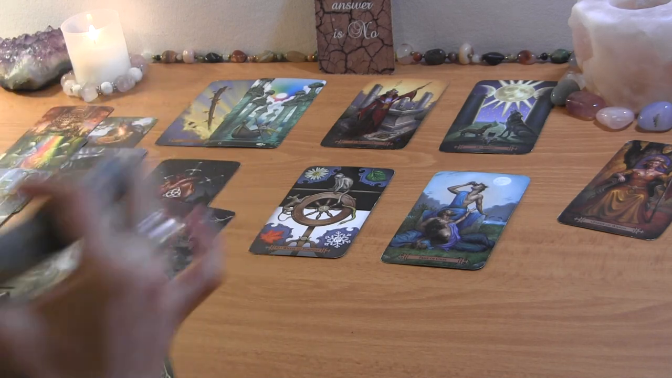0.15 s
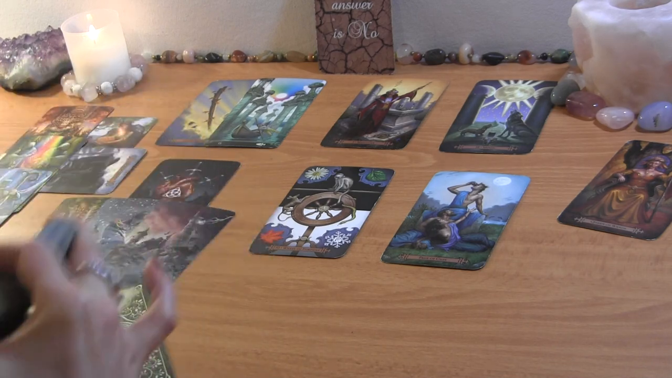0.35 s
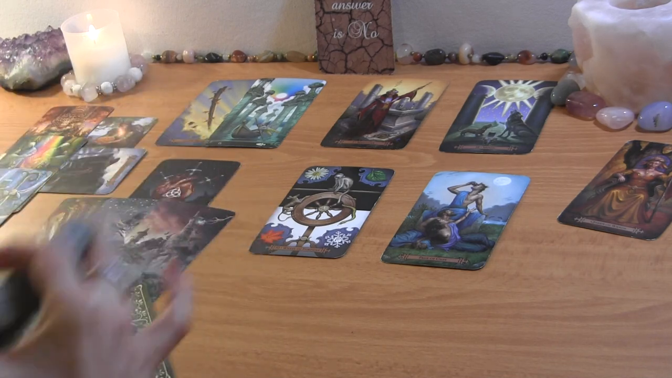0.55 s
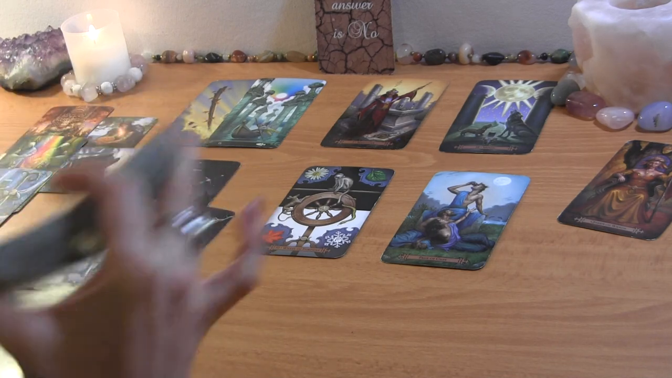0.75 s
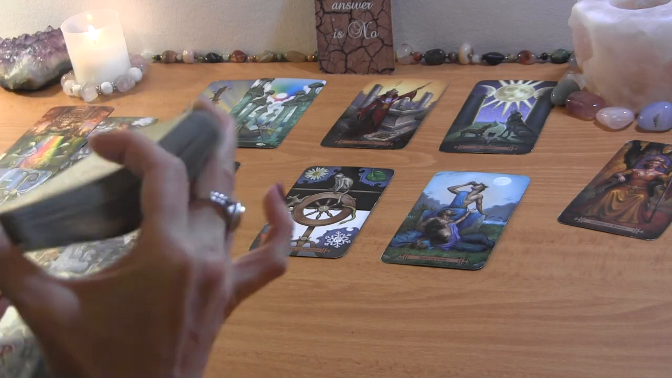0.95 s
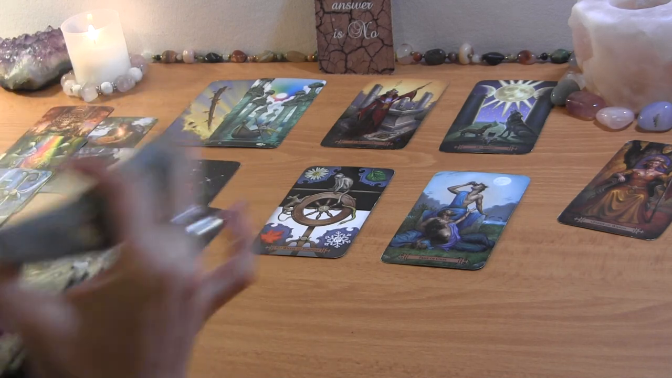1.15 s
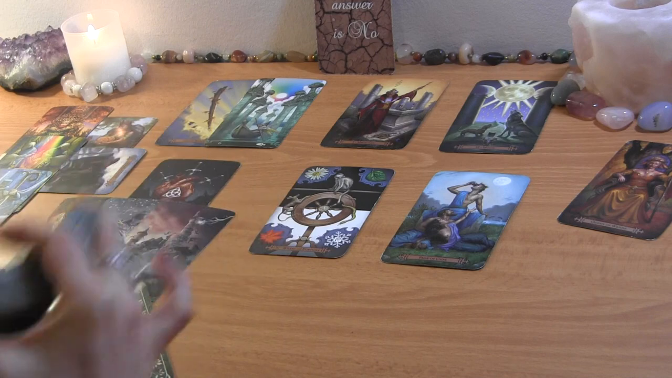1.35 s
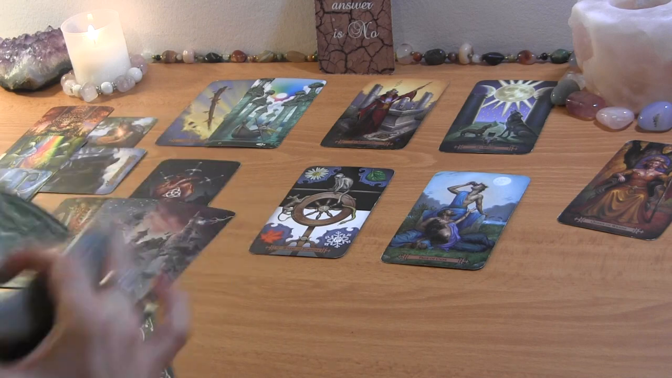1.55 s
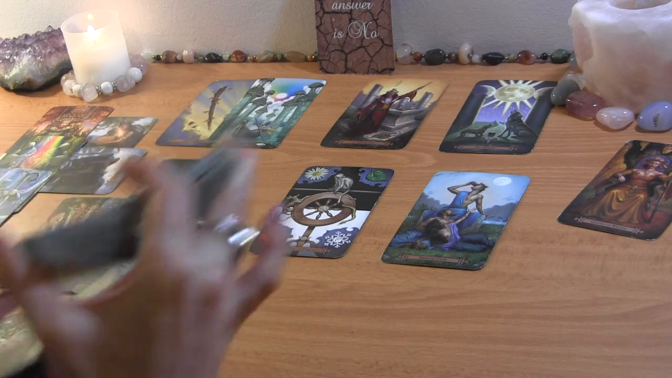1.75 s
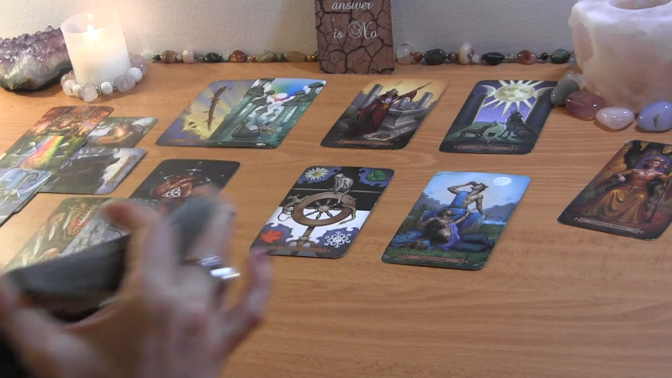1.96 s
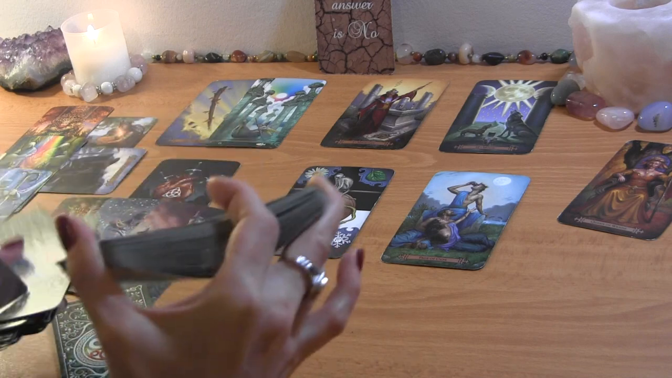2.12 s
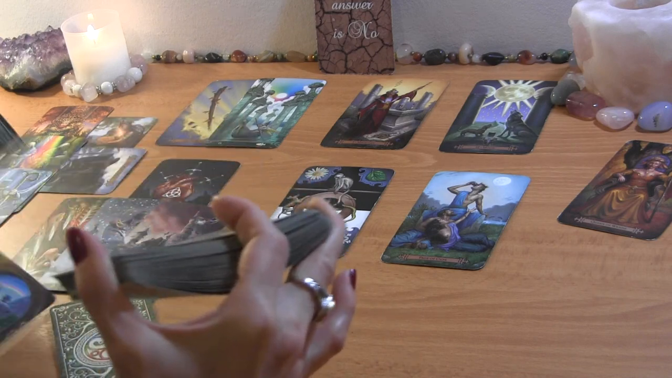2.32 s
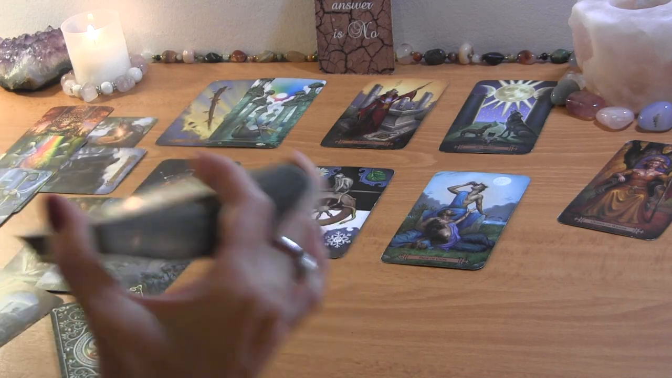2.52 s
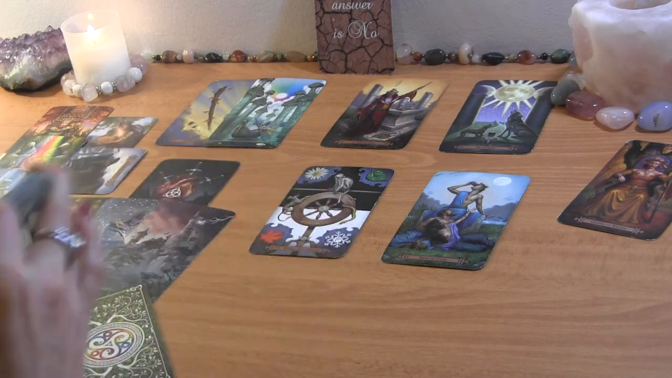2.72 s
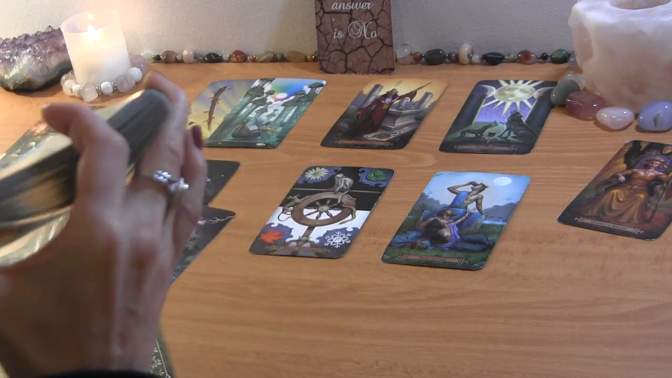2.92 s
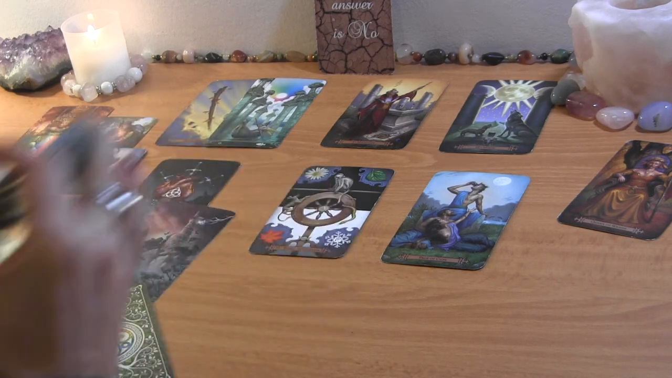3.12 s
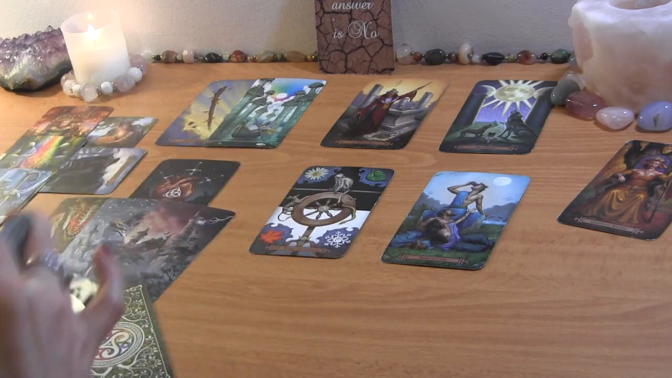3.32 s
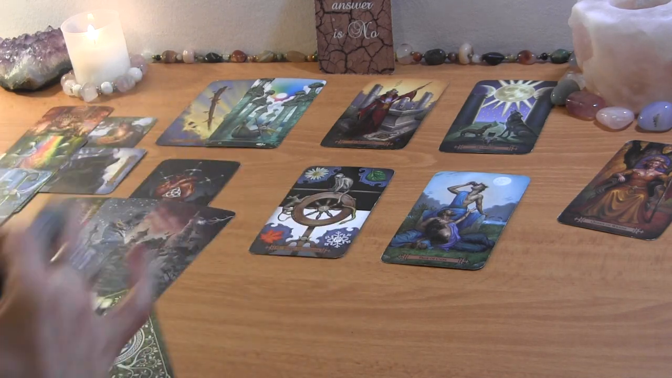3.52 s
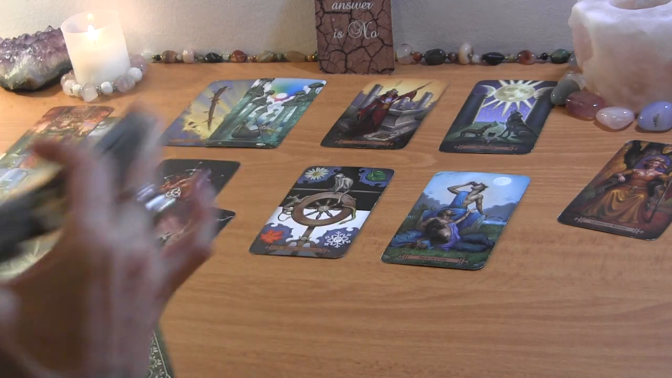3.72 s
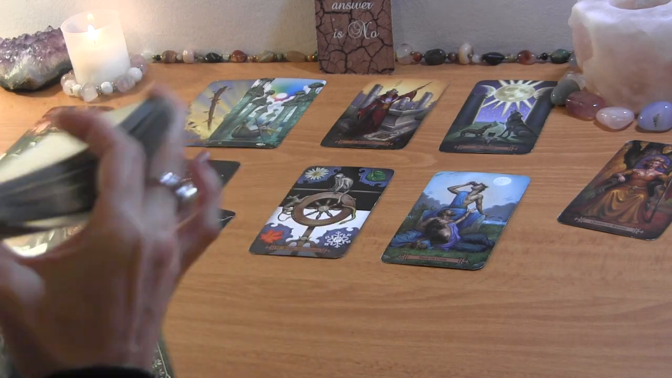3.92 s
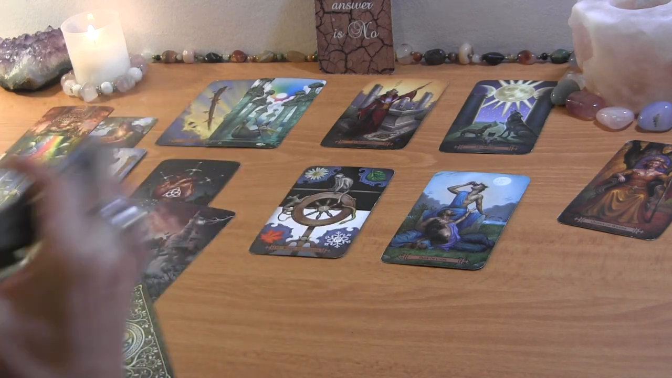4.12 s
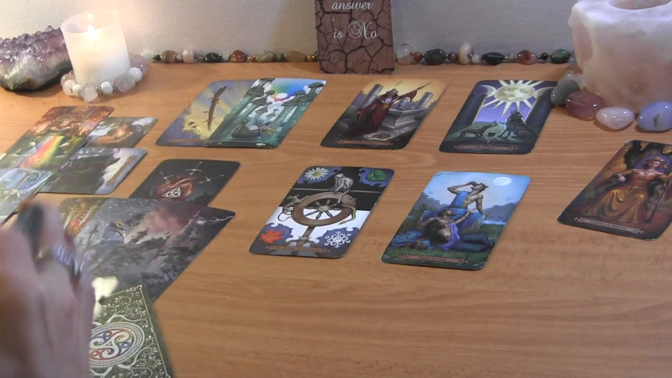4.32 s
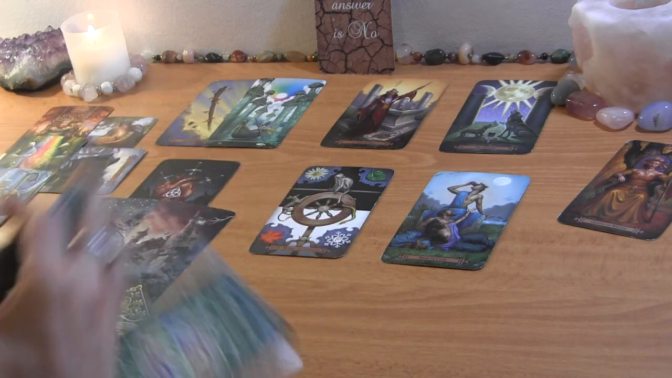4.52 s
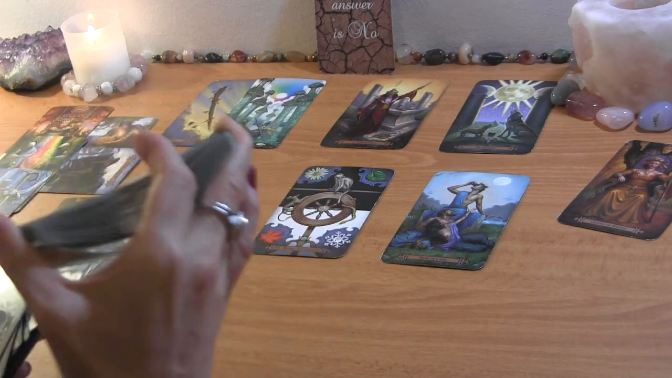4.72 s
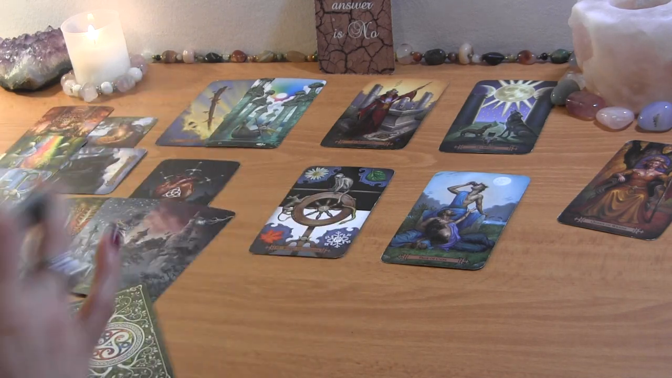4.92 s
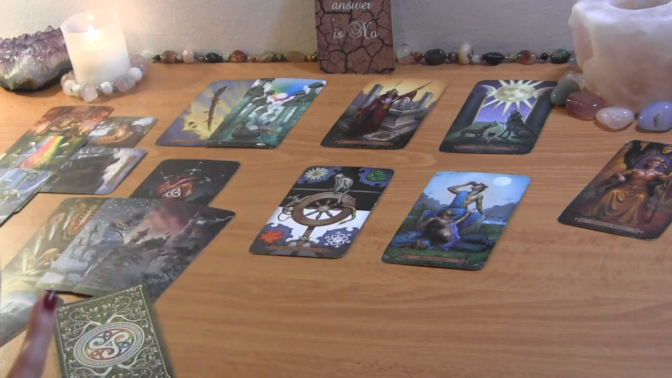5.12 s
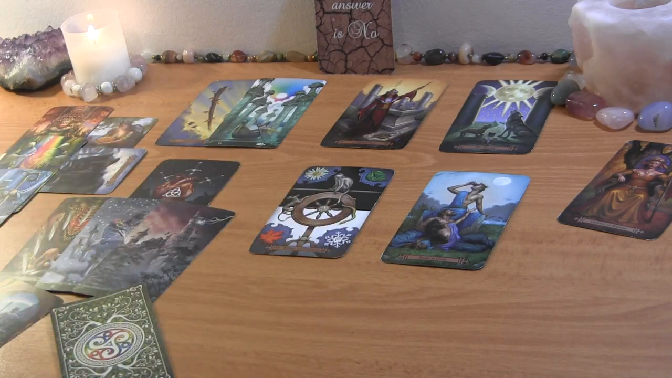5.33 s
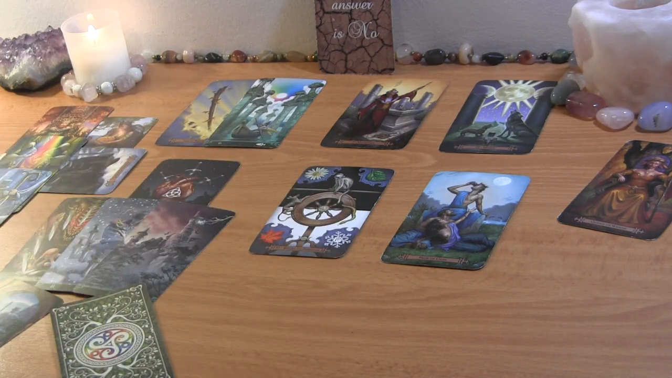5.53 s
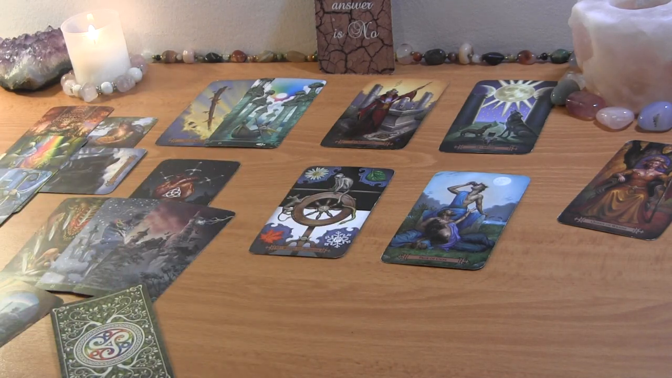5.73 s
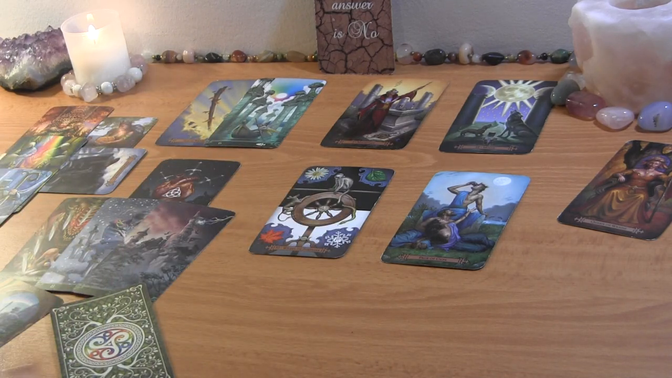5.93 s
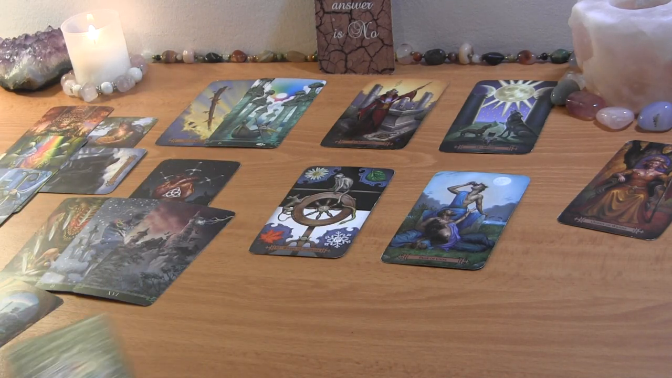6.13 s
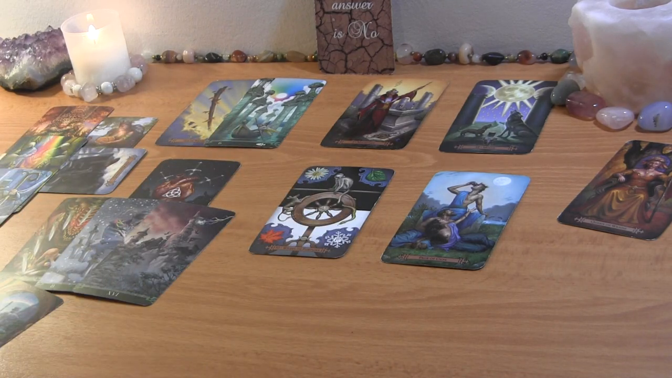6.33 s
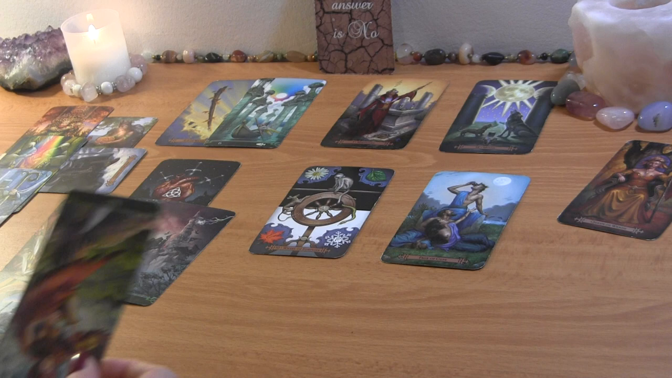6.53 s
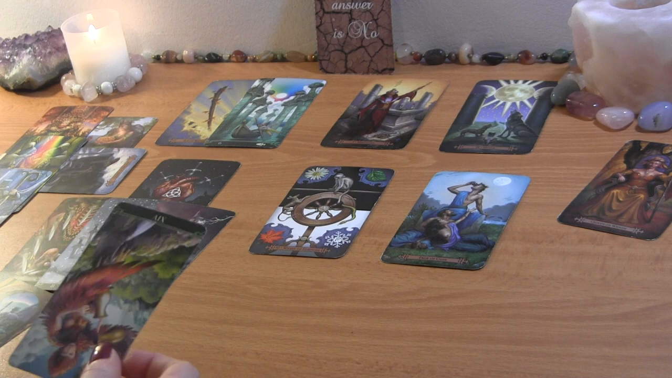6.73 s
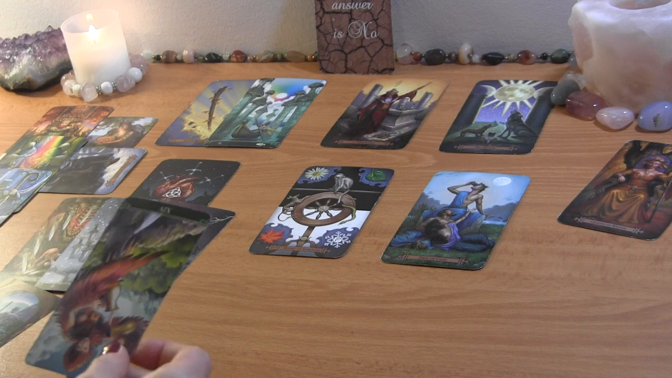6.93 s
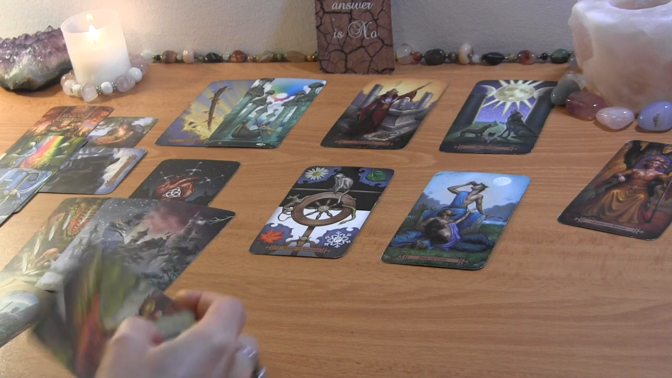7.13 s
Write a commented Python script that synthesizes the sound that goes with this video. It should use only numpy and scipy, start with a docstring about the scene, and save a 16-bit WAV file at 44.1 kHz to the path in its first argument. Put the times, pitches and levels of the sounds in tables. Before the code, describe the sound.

Large cards are shuffled overhand in steady crisp strokes, the deck is rapped on a wooden table, then cards are dragged and one laid down.

```python
"""A deck of large cards is shuffled overhand, then rapped on a wooden table, close by in a small live room.
In each stroke a packet lifts with a click, swishes down, rattles into the other hand and stops with a snap;
between runs the deck is knocked square and single edges flick. Then the deck raps the table, cards are dragged
off it, and one is laid out. Contacts are coloured trains of tiny random impacts; the table rings as dying sines.
Standing waves and seven alternating random echo patterns form the room, over a steady low hush."""
import sys
import numpy as np
from scipy import signal
from scipy.fft import rfft, irfft
from scipy.io import wavfile
from scipy.ndimage import uniform_filter1d

SR = 44100
rng = np.random.default_rng(int(sys.argv[2]) if len(sys.argv) > 2 else 0)


def generate_wav(signal):
    """Clip the signal to [-1, 1] and save it as 16-bit WAV at the path in sys.argv[1]."""
    frames = np.transpose(np.atleast_2d(signal))
    scaled = np.clip(frames, -1, 1) * 32767
    pcm = np.round(scaled).astype(np.int16)
    wavfile.write(sys.argv[1], SR, pcm)


N = 320166

TAPS = 4096
HZ = np.maximum(np.fft.rfftfreq(TAPS, 1 / SR), 1)  # frequency grid of every colour

# Spectrum of contact with the wooden top. Each row: frequency in Hz, relative level in dB.
WOOD_COLOUR = [(60, -26), (200, -15), (400, -6.5), (660, 0.5), (860, -4.5), (1500, -0.5), (1900, 0.5),
               (2700, -4), (3500, -7), (5200, -7.5), (7500, -11.5), (10000, -11), (16000, -38)]
# Low boom of the table. Each row: frequency in Hz, relative level in dB.
BOOM_COLOUR = [(30, -37), (60, -23), (90, -9.5), (120, 0), (190, -0.5), (300, -4), (500, -5), (1000, -22),
               (4000, -38)]

CLICK_S, SNAP_S = 0.0021, 0.0033  # decay times of a card flick and of a packet or deck edge


def amp(db):
    """Amplitude gain is exponential in decibels."""
    return 10 ** (np.asarray(db) / 20)


def read(points, hz):
    """Spectra are interpolated along log frequency, much as pitch is heard."""
    f, value = np.transpose(points)
    return np.interp(np.log(hz + 1), np.log(f), value)


def unit(x):
    """Energy is the sum of squares, here normalised to one."""
    return x / np.sqrt(np.sum(x ** 2) + 1e-20)


def seconds(length):
    """Sampled time: a uniform axis from zero, in seconds."""
    return np.arange(int(length * SR) + 2) / SR


def add(mix, s, sound):
    """Superposition: sound pressures add, here from time s onward."""
    start = round(s * SR)
    sound = sound[max(-start, 0):]
    part = mix[max(start, 0):][:len(sound)]
    part += sound[:len(part)]


def colour(x, db):
    """Minimum-phase filtering: the Hilbert transform of log gain gives the phase of a causal response."""
    log_gain = np.log(amp(np.maximum(db - db.max(), -90)))
    circle = np.concatenate([log_gain, log_gain[-2:0:-1]])
    response = np.exp(np.conj(signal.hilbert(circle)))[:len(HZ)]
    return signal.fftconvolve(x, irfft(response))


def contacts(envelope, db, per_s, spread_db):
    """Rough contact is a random train of uneven impacts, coloured by db and given the envelope's energy."""
    count = len(envelope)
    hits = rng.random(count) < per_s / SR
    hits[0] = True
    sizes = rng.choice([-1, 1], count) * amp(spread_db * np.minimum(rng.exponential(1, count), 3))
    train = hits * sizes * envelope
    # the cluster's own broad peaks are partly evened out, so that the material leads the colour
    power = uniform_filter1d(abs(rfft(unit(train), 8 * TAPS)) ** 2, size=120)[::8]
    evened_db = db - 10 * np.log10(power + .6)
    return unit(colour(train, evened_db)) * np.linalg.norm(envelope)


def tilted(points, tilt_db, pivot_hz=3000):
    """Spectral tilt: a constant slope in dB per octave above 800 Hz, and a fixed offset below."""
    return read(points, HZ) + tilt_db * np.log2(np.maximum(HZ, 800) / pivot_hz)


def resonance_db(hz, width, peak_db):
    """Resonance: a damped oscillator's peak stands out of a flat spectrum."""
    detuning = (HZ ** 2 - hz ** 2) / (HZ * width)
    return 10 * np.log10(1 + amp(peak_db) ** 2 / (1 + detuning ** 2))


def ringing(modes, t):
    """Modal superposition: each mode is a sine of random phase that loses 60 dB in its t60."""
    out = np.zeros(len(t))
    for hz, db, t60 in modes:
        out += amp(db - 60 * t / t60) * np.sin(2 * np.pi * (hz * t + rng.random()))
    return out


def pair(z, hz):
    """Coherence: mid and side shares of two unrelated spectra set the likeness of left and right."""
    # Likeness of the two microphones. Each row: frequency in Hz, correlation from -1 to 1.
    likeness = [(60, 0.11), (200, 0.68), (700, 0.91), (1400, 0.91), (3000, 0.84), (7000, 0.63),
                (15000, 0.49)]
    same = np.clip(read(likeness, hz), -1, 1)[:, None]
    mid, side = np.sqrt((1 + same) / 2) * z[0], np.sqrt((1 - same) / 2) * z[1]
    return np.array([mid + side, mid - side])


def hush(level_db=-56):
    """Low room noise and microphone hiss: stationary Gaussian noise shaped in frequency."""
    # Spectrum of the steady background. Each row: frequency in Hz, relative level in dB.
    hush_colour = [(20, -27.5), (55, -17), (85, -3.5), (180, 1), (300, -2), (700, -6), (1200, -10.5),
                   (4000, -15), (12000, -22), (16000, -31)]
    hz, _, z = signal.stft(rng.standard_normal((2, N)), SR, nperseg=2048)
    shaped = pair(z, hz) * amp(read(hush_colour, hz))[:, None]
    x = signal.istft(shaped, SR, nperseg=2048)[1][:, :N]
    return amp(level_db) * x / x.std()


def snap(db, tilt_db, length, peak_width_hz=900, peak_db=8, span=0.0024):
    """Impact: contacts die within milliseconds; a randomly placed broad resonance varies the colour."""
    # Spectrum of a card edge snapping. Each row: frequency in Hz, relative level in dB.
    snap_colour = [(80, -7.5), (300, 3), (1000, 1.5), (1700, 2.5), (3200, 0), (5200, 1), (8000, 0),
                   (11500, -2.5), (14000, -12.5), (16000, -28)]
    peak_hz = np.exp(rng.uniform(np.log(2500), np.log(9000)))
    shape = tilted(snap_colour, tilt_db) + resonance_db(peak_hz, peak_width_hz, peak_db)
    burst = unit(contacts(np.exp(-seconds(0.0048) / length), shape, 7000, 1.9))
    return amp(db) * np.sqrt(span * SR) * burst


def clap(db, hollows_hz, decay, hollow_q=4.5):
    """Cavity resonance: loose cards clap shut, and the enclosed air lends two hollow pitches."""
    # Spectrum of the loose deck. Each row: frequency in Hz, relative level in dB.
    deck_colour = [(50, -38), (150, -8.5), (400, -5), (1500, -9.5), (4000, -16), (10000, -21), (16000, -31)]
    lower_hz, upper_hz = hollows_hz
    lower = resonance_db(lower_hz, lower_hz / hollow_q, 15)
    upper = resonance_db(upper_hz, upper_hz / hollow_q, 16.5)
    shape = read(deck_colour, HZ) + np.maximum(lower, upper)
    return amp(db) * contacts(np.exp(-seconds(0.18) / decay), shape, 3000, 2.3)


def landing(s, db, edge_hz, palm_db, swish_db=-12, swish_rise=0.014, edge_width_hz=1100, edge_db=6,
            rattle_s=.0135, rattle_tilt_db=-1.1, rattle_fall=0.00078, palm_delay=0.0076, palm_fall=0.013,
            hollow_width_hz=120, hollow_db=1, settle_db=-13, settle_fall=0.008):
    """Successive impacts: a packet swishes in, rattles home and settles in the palm; lists (s, sound)."""
    # Spectrum of rattling edges. Each row: frequency in Hz, relative level in dB.
    rattle_colour = [(70, -9.5), (140, -3.5), (400, 2), (1200, -7), (2600, 2), (3600, 1), (5300, 1),
                     (7500, 1.5), (11000, -1), (13500, -10), (16000, -25)]
    # Spectrum of the push into the palm. Each row: frequency in Hz, relative level in dB.
    palm_colour = [(40, -16), (80, -20.5), (135, -1.5), (210, -1.5), (450, -1.5), (780, -1), (1200, -6),
                   (1700, 0), (2700, -10), (4500, -55), (12000, -30.5)]
    # Spectrum of the swish. Each row: frequency in Hz, relative level in dB.
    swish_colour = [(150, -7.5), (600, 9), (1500, 3.5), (4000, 1.5), (9000, 2), (13000, 1), (16000, -14)]
    lead, t = seconds(0.076), seconds(0.05)
    edges = tilted(rattle_colour, rattle_tilt_db) + resonance_db(edge_hz, edge_width_hz, edge_db)
    palm_hollow_hz = rng.uniform(385, 580)
    palm = read(palm_colour, HZ) + resonance_db(palm_hollow_hz, hollow_width_hz, hollow_db)
    swish = np.exp((lead - lead[-1]) / swish_rise)
    rattle = np.minimum(t / .0025, 1) * np.exp(-np.maximum(t - rattle_s, 0) / rattle_fall)
    push = np.minimum(t / palm_delay, 1) * np.exp(-np.maximum(t - palm_delay, 0) / palm_fall)
    settle = np.exp(-t / settle_fall)
    return [(s - lead[-1], amp(db + swish_db) * contacts(swish, read(swish_colour, HZ), 9000, 2.7)),
            (s, amp(db) * contacts(rattle, edges, 2800, 2.0)),
            (s + rattle_s, amp(db + settle_db) * contacts(settle, edges, 570, 1.5)),
            (s, amp(palm_db) * contacts(push, palm, 2500, 2.7))]


def shuffle(tick_db=-41, tick_spread_db=2.5, tick_tilt_db=-3, tick_lead_s=.065, count=2):
    """A stroke is a chain of contacts: lift-off, landing and stop, with faint random ticks before landing."""
    # Shuffling strokes. Each row: packet landing in seconds, level in dB, edge resonance in Hz, push into
    # the palm in dB, lead of the lift in seconds, lift in dB, delay of the stop in seconds, stop in dB.
    strokes = [(.001, -25.5, 4100, -28.5, .08, -30, 0.011, -37),
               (.234, -24, 5400, -27.5, .077, -24.5, 0.023, -22),
               (0.48, -25.5, 4740, -34.5, 0.073, -26.5, 0.025, -17.5),
               (0.736, -25, 5440, -28.5, .024, -30.5, 0.03, -23.5),
               (0.981, -27.5, 3870, -37, 0.024, -35.5, 0.031, -23.5),
               (1.224, -23, 5300, -30.5, 0.069, -36, 0.024, -22),
               (1.476, -26, 6000, -27, 0.071, -34, 0.034, -26),
               (2.912, -33.5, 5730, -40.5, .054, -28.5, 0.014, -20.5),
               (3.193, -25, 5430, -33.5, 0.077, -27, 0.028, -28),
               (3.456, -22.5, 5400, -29, .066, -37, .023, -24.5),
               (3.715, -26, 5340, -33.5, 0.044, -37, 0.033, -26.5),
               (3.961, -24, 4760, -34.5, 0.033, -37, 0.036, -22),
               (4.210, -25.5, 6000, -34, .023, -53, 0.038, -25),
               (4.745, -30.5, 5560, -34, 0.056, -24, 0.015, -23)]
    out = np.zeros(N)
    for s, db, edge_hz, palm_db, lead, lift_db, delay, stop_db in strokes:
        add(out, s - lead, snap(lift_db, -1.5, SNAP_S))
        # the gap in the deck claps shut behind the packet
        add(out, s - lead, clap(lift_db - 4, (1730, 2620), .007))
        for _ in range(count):
            at = s - tick_lead_s * rng.random()
            level_db = tick_db + tick_spread_db * rng.standard_normal()
            add(out, at, snap(level_db, tick_tilt_db, CLICK_S))
        for at, sound in landing(s, db, edge_hz, palm_db):
            add(out, at, sound)
        add(out, s + delay, snap(stop_db, -1.3, 0.003))
    return out


def handling():
    """Impact and cavity resonance: the deck is knocked square in cupped hands; single edges flick by."""
    # Knocks of the deck. Each row: start in seconds, level in dB, lower and upper hollow pitch in Hz,
    # decay time in seconds, edge snap in dB.
    knocks = [(1.626, -24.5, 820, 1290, .011, -30.5), (1.895, -20, 1210, 1630, .011, -36),
              (2.087, -41.5, 398, 900, 0.0088, -40), (2.3308, -32.5, 975, 1780, 0.0085, -29.5),
              (2.372, -33.5, 690, 1430, 0.0039, -34), (2.8001, -22.5, 1000, 2100, 0.0042, -24.5),
              (4.6186, -28, 610, 930, 0.03, -24), (5.0325, -23, 1750, 2620, 0.01, -21.5),
              (5.555, -35.5, 1920, 2680, 0.017, -45), (6.548, -30, 580, 794, 0.0051, -51)]
    # A card edge flicks past a finger or nail. Each row: start in seconds, level in dB, treble tilt in
    # dB per octave.
    clicks = [(1.64, -30, 4), (1.6545, -25, -3), (1.753, -29.5, -3.5), (1.7837, -19, -1),
              (2.096, -34, -6.5), (2.388, -28.5, -5), (2.4618, -34, 2.5), (2.936, -27, -3.5),
              (4.694, -23, 0), (5.0381, -25, -3.5), (5.276, -29.5, 0), (6.1414, -32.5, 10),
              (6.307, -33, -1.5), (6.539, -30.5, -3.5), (6.862, -40, -2.5)]
    out = np.zeros(N)
    for s, db, lower_hz, upper_hz, decay, snap_db in knocks:
        add(out, s, snap(snap_db, 0, SNAP_S))
        add(out, s, clap(db, (lower_hz, upper_hz), decay))
    for s, db, tilt_db in clicks:
        add(out, s, snap(db, tilt_db, CLICK_S))
    return out


def slides(skirt_db=9, swell_share=0.34):
    """Sliding friction: fine grains swell and fade exponentially as a card rubs on deck or wood."""
    # Rubs. Each row: peak in seconds, rise and fall times together in seconds, level in dB,
    # centre in Hz, width in octaves.
    rubs = [(1.739, 0.059, -39.5, 8950, 6.4), (1.801, 0.024, -38, 4130, 1.7), (1.889, .007, -34, 4000, 2.5),
            (1.90, .014, -26.5, 574, .7), (1.982, 0.023, -37, 5100, 1.3), (2.031, 0.024, -37.5, 9900, 1.3),
            (2.047, .03, -37.5, 2080, 2), (2.856, 0.055, -39.5, 1800, 2), (2.894, 0.05, -38.5, 6540, 1),
            (4.426, 0.018, -41.5, 3930, 5.6), (4.469, .035, -40, 7450, 2.5),
            (4.486, 0.047, -38.5, 480, 1.77), (4.732, 0.037, -33.5, 4700, 2.1),
            (4.939, .012, -42.5, 2770, 1.16), (5.274, 0.0084, -33, 6470, 1.9),
            (5.42, 0.027, -43.5, 1980, 2.8), (5.629, 0.052, -37, 2500, 2.5), (6.089, 0.05, -30, 650, 1.05),
            (6.219, 0.4, -52.5, 8700, 1.1), (6.534, 0.019, -42, 3480, 2.2),
            (7.13, 0.044, -39.5, 1160, 0.98)]
    out = np.zeros(N)
    for s, length, db, hz, octaves in rubs:
        rise, fall = length * swell_share, length * (1 - swell_share)
        t = seconds(4 * length) - 4 * rise  # zero at the peak
        band_db = -skirt_db * np.log2(1 + (np.log2(HZ / hz) / octaves) ** 2)
        shape = band_db - 10 * np.log10(1 + (HZ / 12500) ** 10)
        swell = np.exp(np.minimum(t / rise, -t / fall))
        add(out, s + t[0], amp(db) * contacts(swell, shape, 5000, 2.3))
    return out


def table(ring_db=-3, steepness=2.8, boom_fall=0.059):
    """Modal excitation: a quick cluster of contacts sets the wooden top ringing and booming."""
    # The deck or a card meets the table. Each row: start in seconds, level in dB, softness cut-off in Hz,
    # rise time in seconds, decay time in seconds, boom in dB.
    blows = [(5.663, -26, 1780, 0.0039, 0.0081, -37), (5.8, -12.5, 4470, 0.00302, 0.019, -35),
             (6.846, -46.5, 2380, 0.0027, 0.018, -50.5), (7.126, -27.5, 2250, 0.009, 0.0045, -38)]
    # Modes of the table top. Each row: frequency in Hz, relative level in dB, t60 in seconds.
    top_modes = [(132.3, -2, 0.25), (185.3, -9, 1), (269, -17.5, 0.42), (432, -37, 0.87), (629, -12.5, .45),
                 (672, 6, 0.2), (831, -5.5, 0.29), (1166, -6.5, 0.14), (1457, 6, 0.3), (1505, 2, 0.27),
                 (1773, 12, 0.19), (1890, 3.5, 0.14), (2224, -11, 0.19), (2730, 5, 0.3)]
    out = np.zeros(N)
    t = seconds(0.11)
    top = ringing(top_modes, seconds(.6))
    for s, db, soft_hz, rise, decay, boom_db in blows:
        press, after = np.minimum(t / rise, 1), np.maximum(t - rise, 0)
        soft_db = -10 * np.log10(1 + (HZ / soft_hz) ** (2 * steepness))
        blow = amp(db) * contacts(press * np.exp(-after / decay), read(WOOD_COLOUR, HZ) + soft_db, 8000, 1.0)
        add(out, s, blow)
        # the ring takes its strength from the energy of the blow
        ring = amp(ring_db) * np.linalg.norm(blow) * unit(colour(top, soft_db))
        add(out, s + rise / 2, ring)
        boom = contacts(press * np.exp(-after / boom_fall), read(BOOM_COLOUR, HZ), 2000, 4.6)
        add(out, s, amp(boom_db) * boom)
    return out


def drags(level_db=-3, soft_hz=1880, steepness=1.88, grains_per_s=800, spread_db=3.5, boom_db=-7):
    """Stick-slip friction: cards catch on the wood, which colours the grains and booms under them."""
    # One curve for each pull over the table. Each row of a curve: time in seconds, relative level in dB.
    pulls = [
        [(5.93, -26), (5.968, -31), (6.026, -34.5), (6.072, -25), (6.3, -88), (6.304, -51), (6.422, -55.5),
         (6.43, -45), (6.5, -58)],
        [(7.15, -41), (7.176, -42), (7.254, -46), (7.26, -34)],
    ]
    out = np.zeros(N)
    wood = read(WOOD_COLOUR, HZ) - 10 * np.log10(1 + (HZ / soft_hz) ** (2 * steepness))
    for curve in pulls:
        at, db = np.transpose(curve)
        t = at[0] + seconds(at[-1] - at[0])
        effort = amp(level_db + np.interp(t, at, db))
        add(out, at[0], contacts(effort, wood, grains_per_s, spread_db))
        add(out, at[0], amp(boom_db) * contacts(effort, read(BOOM_COLOUR, HZ), 2000, 1.2))
    return out


def reflections(t):
    """Diffuse reverberation: dense random echoes decay exponentially, each band at its own rate."""
    # Decay of the room. Each row: frequency in Hz, t60 in seconds.
    decay_times = [(100, 0.16), (260, 0.46), (700, 0.46), (1840, 0.41), (4850, 0.42), (9000, 0.35),
                   (15000, 0.2)]
    # Strength of the echoes. Each row: frequency in Hz, level against the direct sound in dB.
    echo_levels = [(40, -29), (120, -4), (500, 1), (2000, 2), (5000, -1.5), (9000, -5.5), (15000, -2)]
    hz, at, z = signal.stft(rng.standard_normal((2, len(t))), SR, nperseg=256)
    t60 = read(decay_times, hz)[:, None]
    decay = amp(read(echo_levels, hz)[:, None] - 60 * at / t60)
    energy_scale = np.sqrt(2 * np.log(1000) / (t60 * SR))  # equal energy for long and short decays
    z = pair(z, hz) * decay * energy_scale
    return signal.istft(z, SR, nperseg=256)[1][:, :len(t)]


def room(x, gap=.004, hop=.014, count=7):
    """Direct sound, standing waves, and diffuse reverberation alternating among random echo patterns."""
    # Standing waves. Each row: frequency in Hz, level in dB, t60 in seconds.
    standing_waves = [(128.2, -63, 0.52), (183.2, -57.5, 0.2), (215, -58, 0.48), (267.7, -55, 0.45),
                      (449, -50, 0.29), (607, -49.5, 0.27), (774, -49.5, 0.27), (1530, -99, 0.19)]
    t = np.arange(8 * TAPS) / SR
    wet = signal.oaconvolve(x, ringing(standing_waves, t))[None, :N]
    # the patterns take turns on a fixed clock, crossfading at constant power, to avoid steady tonal lines
    for place in range(count):
        turn = (np.arange(N) / (hop * SR) + place) % count
        share = np.sin(np.pi / 2 * turn) * (turn < 2)
        wet = wet + signal.oaconvolve((x * share)[None], reflections(t), axes=1)[:, :N]
    return x + np.pad(wet, ((0, 0), (round(gap * SR), 0)))[:, :N]


def scene():
    """Superposition: hands and table share one room, slightly louder on the right, over the hush."""
    hands = room(shuffle() + handling() + slides() + table() + drags())
    return hands * amp([[-.15], [.15]]) + hush()


def record(dry, low_cut_hz=40, edge_hz=16200):
    """Band limitation: a second-order bass roll-off and a steep linear-phase treble cut."""
    thin = signal.sosfilt(signal.butter(2, low_cut_hz, "highpass", fs=SR, output="sos"), dry)
    treble_cut = signal.firwin(511, edge_hz, window=("kaiser", 9), fs=SR)
    return signal.oaconvolve(thin, treble_cut[None], "same")


dry = scene()
out = record(dry)
generate_wav(out)
```